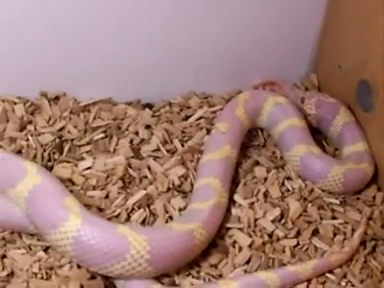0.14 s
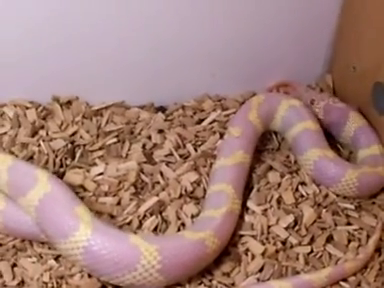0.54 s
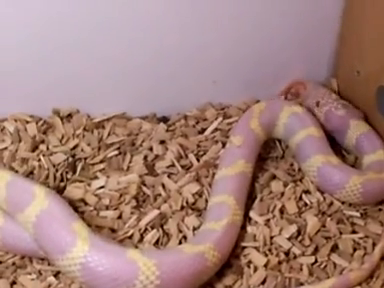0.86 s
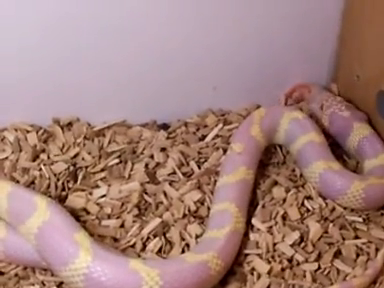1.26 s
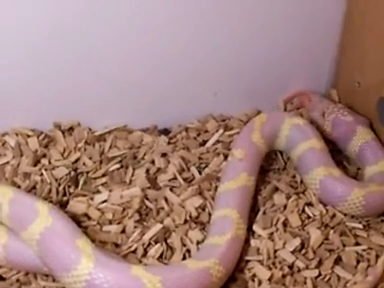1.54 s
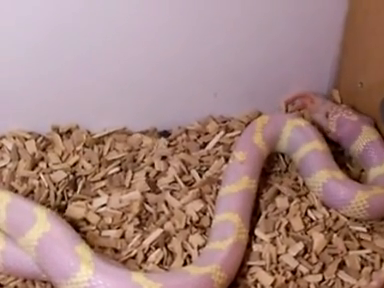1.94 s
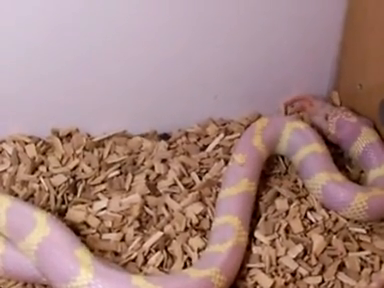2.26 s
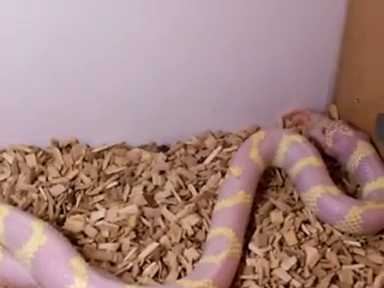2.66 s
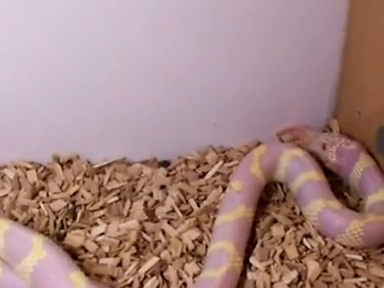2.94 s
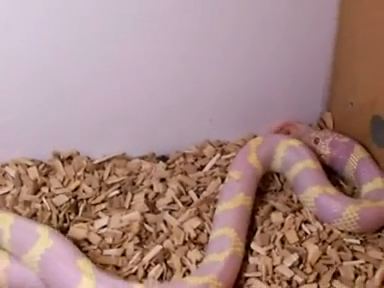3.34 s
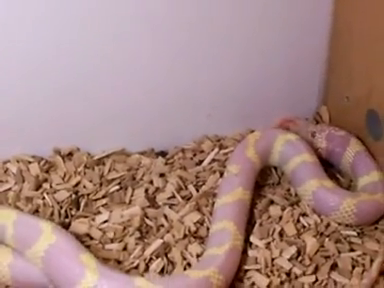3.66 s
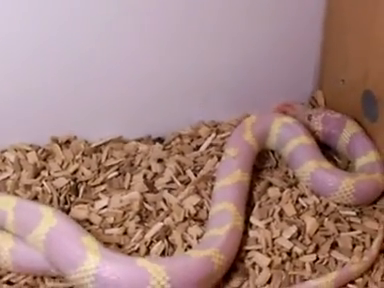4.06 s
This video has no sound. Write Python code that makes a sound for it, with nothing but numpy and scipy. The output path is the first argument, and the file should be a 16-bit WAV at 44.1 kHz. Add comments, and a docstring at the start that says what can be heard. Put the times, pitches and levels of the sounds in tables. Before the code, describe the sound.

A snake slides through dry wood chips in a box, with hissing scrapes, crisp crunches and dull low thumps, loudest near the end.

```python
"""In a wooden box of wood chips, a snake shifts about while a quiet room hums behind.
Its scales drag the chips in hissing strokes: rubbing grains coloured by resonances of the walls.
Chips crunch and tick as coils push: noise clumps and clean taps that ring the box; one chip squeaks in partials.
Pushes boom the box floor and low knocks sound floor and side panels, all as decaying sines, over a rumble
of filtered noise.
"""
import sys
import numpy as np
from scipy import signal
from scipy.fft import rfft, irfft, next_fast_len
from scipy.io import wavfile
from scipy.ndimage import uniform_filter1d, map_coordinates

SR = 44100
rng = np.random.default_rng(int(sys.argv[2]) if len(sys.argv) > 2 else 0)


def log_audio(samples):
    """Write samples as a 16-bit WAV file to the path given in sys.argv[1]."""
    # one column per channel
    frames = np.atleast_2d(samples).T
    # limit to full scale, then quantise
    limited = np.clip(frames, -1, 1)
    pcm = np.round(limited * 32767).astype(np.int16)
    wavfile.write(sys.argv[1], SR, pcm)


N = 184982  # samples

# Spectrum of the room tone; the last two points are left out: [f/Hz, relative density/dB]
ROOM_SPECTRUM = [(12, -48.5), (20, -20.5), (38, 6.5), (143, 5.5), (181, -1.5), (276, 0), (333, -1.5),
                 (1020, -11.5), (1230, -12.5), (5400, -21.5), (7020, -55), (11900, -120)]
ROOM_DB = -41
# Top of the band, for the room and for the whole sound
TOP_HZ = 7860

# Weight of the body on the floor: [t/s, rumble level/dB]
BODY_WEIGHT = [(0, -47), (.2, -40.5), (.33, -49), (.49, -42.5), (.61, -48.5), (.83, -47.5), (1.01, -37.5),
               (1.3, -41), (1.68, -47), (1.84, -46), (2.02, -42.5), (2.1, -37.5), (2.29, -36),
               (2.55, -45.5), (2.68, -39.5), (3.01, -37), (3.3, -37), (3.56, -53.5), (3.78, -44.5),
               (4.04, -40.5), (4.19, -48)]
# Resonances of the box, the first two belonging to its floor: [f/Hz, width/Hz, relative level/dB]
BOX_MODES = [(53.7, 24, -6.5), (140.3, 45, -4.5), (231.4, 12, 0.5), (252.7, 27, -7.5), (333.7, 7.1, -5),
             (503, 19, -11), (599.3, 20, -13.5), (765, 6.6, -26), (964, 29, -13), (1101, 21, -12),
             (1343, 33, -16.5), (1585, 24, -18), (1753, 17, -29.5)]
# Panels that the sliding body rubs: [f/Hz, width/Hz, relative level/dB]
PANEL_MODES = [(228.5, 82, -5), (343, 40, 1), (496, 27, -10), (585, 29, -6)]
# Panel rub against the weight, and against the scrape
RUB_WEIGHT_DB, RUB_STROKE_DB = -8.5, -12.5
# Each crunch shakes floor and panels
JOLT_FLOOR_DB, JOLT_RUB_DB, JOLT_T60_S = -13.5, -23.5, 0.13

# Low knocks of the box, near 200 Hz from its floor, higher from its side panels: [t/s, level/dB, f/Hz, hold/s]
BOX_KNOCKS = [(0.115, -29, 324, 0.014), (0.188, -28, 202, 0.013), (0.231, -32.5, 332.4, 0.018),
              (0.552, -37, 266, 0.011), (0.679, -35.5, 305, 0.02), (1.363, -34, 341.5, 0.017),
              (2.052, -36, 306, 0.016), (2.165, -23.5, 299, 0.012), (2.209, -29, 350, 0.02),
              (2.33, -28.5, 341, 0.013), (2.444, -31, 324.5, 0.012), (2.609, -20, 349.6, 0.018),
              (3.193, -21.5, 239.7, 0.032), (3.649, -38, 363, 0.015), (3.803, -20, 201, 0.0089),
              (3.813, -10, 253, 0.018), (3.835, -18.5, 335, 0.014), (3.905, -16, 259, 0.0073),
              (3.919, -24.5, 329, 0.011), (4.15, -24.5, 339, 0.01)]
KNOCK_SWELL_S, KNOCK_T60_S = 0.0064, 0.061  # time constant of the swell, decay by 60 dB

# Crunches of chips: [t/s, relative level/dB, tilt/dB per octave, hold/s, t60/s, relative box ring level/dB]
CHIP_CRUNCHES = [(0.119, -39, -2, .007, .077, 2), (0.166, -14, -9.5, 0.0052, 0.089, -5.5),
                 (0.186, -22.5, -8.5, 0.0044, 0.23, -6.5), (0.23, -18, -11, 0.0046, .08, -4.5),
                 (0.467, -31.5, -7, .007, 0.05, -4.5), (0.518, -34, 0, .016, .092, -15),
                 (0.622, -25, -1, 0.0068, .09, -10.5), (1.159, -22.5, -.5, .007, 0.087, -12),
                 (1.794, -26.5, -6, 0.0071, 0.11, -11.5), (2.159, -14.5, -1, 0.021, 0.076, -7.5),
                 (2.315, -28, -9.5, 0.0023, 0.12, 4.5), (2.583, -21.5, -5, .011, 0.031, -2),
                 (2.603, -13.5, 2, 0.0049, 0.028, 1), (2.61, -17.5, -4, 0.016, 0.045, -4),
                 (2.628, -24, -7, 0.0053, .089, 0), (2.995, -12.5, -2, .0063, 0.054, -6.5),
                 (3.037, -24, -3, 0.0056, .046, -3), (3.125, -18, 1.5, 0.0066, .02, -16),
                 (3.168, -22.5, 3, .013, .055, -10), (3.18, -12, -0.5, 0.017, 0.072, -6.5),
                 (3.193, -14, -15.5, .0033, 0.018, -2), (3.249, -30.5, 0, .014, 0.049, -10),
                 (3.801, -6.5, -2, 0.0099, 0.068, 2.5), (3.813, -17.5, -10, .0046, 0.021, -13),
                 (3.819, -8, -7, .01, 0.05, -4.5), (3.835, -24, -2, .005, 0.071, -6),
                 (3.904, -14.5, -2, .0043, 0.078, -2.5), (4.014, -38.5, -2, .007, 0.053, 2.5),
                 (4.147, -17.5, -6, 0.0068, .05, -0.5)]
RING_TILT_DB = 1.17  # per octave, added to the box modes that ring after a crunch
# Under a strong stroke a crunch swells: most added rise time, and the scrape level that brings it
SOFT_RISE_S, SOFT_AT_DB = 0.0035, -34

# Short squeak of a chip on the wall, one partial a row: [t/s, length/s, f/Hz, level/dB]
SQUEAK_PARTIALS = [(0.178, 0.027, 1040, -31.5), (0.185, 0.018, 1375, -29.5), (0.183, 0.035, 1630, -32.5),
                   (0.188, 0.02, 1840, -28.5), (0.2054, 0.019, 1860, -32.5), (0.174, 0.052, 3180, -40.5),
                   (0.183, 0.0225, 6500, -47)]

# Pushes on the box floor: [t/s, level/dB, f/Hz, hold/s, t60/s, direction (1 in, -1 out)]
FLOOR_PUSHES = [(0.184, -14, 111.3, 0.0067, 0.071, -1), (0.204, -21, 115.7, .019, 0.23, -1),
                (0.227, -27.5, 122, 0.0035, 0.053, 1), (0.401, -25, 107.6, 0.016, 0.11, 1),
                (0.686, -31.5, 129.6, 0.022, .2, 1), (0.869, -35, 119, 0.05, 0.15, 1),
                (0.994, -24, 117, 0.0042, 0.28, -1), (1.133, -29.5, 116.3, 0.08, .078, 1),
                (1.318, -22, 123.5, 0.0083, 0.2, -1), (1.36, -24, 120, .02, .19, 1),
                (1.863, -21, 116.6, .011, .18, 1), (2.019, -29.5, 127.4, 0.013, 0.15, 1),
                (2.06, -27.5, 90.4, .02, 0.14, -1), (2.17, -13.5, 126.6, .013, 0.068, 1),
                (2.293, -20, 144.4, 0.026, 0.35, 1), (2.37, -15, 130.9, .058, 0.14, 1),
                (2.582, -16.5, 105, 0.011, 0.047, 1), (2.623, -20.5, 103.3, .0053, 0.14, 1),
                (2.706, -28, 97.7, 0.012, 0.43, 1), (2.78, -26.5, 125, 0.0098, 0.11, 1),
                (2.888, -25, 129, .009, 0.27, 1), (2.954, -26, 136, .007, 0.24, 1),
                (3.006, -29, 127.7, 0.083, 0.14, 1), (3.176, -33.5, 117.2, 0.022, 0.5, 1),
                (3.237, -21.5, 134.2, 0.059, 0.11, 1), (3.378, -32, 130.2, .015, 0.57, 1),
                (3.802, -1, 116.7, 0.0028, 0.054, -1), (3.836, -17, 116, .004, 0.19, 1),
                (3.904, -14, 108.4, 0.0052, .04, -1), (3.922, -15.5, 121, 0.0023, 0.16, 1),
                (4.007, -24, 112, 0.018, 0.047, 1), (4.147, -12, 109, 0.0017, .08, 1)]
SWELL_S, SWELL_SHARE = 0.002, 0.14  # rise of a push: a least time plus a share of its hold

# Strokes of the body: [tilt/dB per octave, wall hum against scrape/dB, rows of (t/s, scrape level/dB)]
BODY_STROKES = [(1.74, -10, [(.44, -61.5), (.53, -44.5), (.75, -47), (.88, -40.5), (1.1, -39),
                (1.16, -33.5), (1.29, -33.5), (1.33, -36.5), (1.39, -60)]), (2.3, -9, [(2.02, -47.5),
                (2.06, -40), (2.15, -35.5), (2.225, -34.5), (2.24, -31), (2.28, -28), (2.31, -30.5),
                (2.4, -34), (2.43, -42), (2.49, -58)]), (4, -8.5, [(2.9, -60), (2.935, -41), (2.98, -34),
                (3.07, -35.5), (3.16, -36.5), (3.22, -35), (3.28, -58)]), (3.7, -10, [(3.75, -59),
                (3.795, -41.5), (3.87, -47), (3.96, -66.5)]), (3.5, -27, [(4.05, -62), (4.14, -43),
                (4.19, -46)])]
STILL_DB = -90  # scrape level between strokes
# Spectrum of chips rubbing: [f/Hz, relative density/dB]
CHIP_SPECTRUM = [(200, -23.5), (700, -15), (1500, 3.5), (3500, -2), (5200, -4)]
# Walls and air of the box over the scraping: [f/Hz, width/Hz, relative level/dB]
WALL_MODES = [(1580, 35, -12), (2192, 19, 1), (2194, 4.9, 3.5), (2370, 25, -18), (2845, 13, 2),
              (3330, 30, -9), (3357, 62, -8.5), (3600, 49, 1.5), (3876, 61, -8.5), (4400, 50, -21.5),
              (4390, 39, -13), (4830, 120, 0), (4880, 15, -10)]
# Low wall modes that hum under the strokes: [f/Hz, width/Hz, relative level/dB]
WALL_HUM_MODES = [(956, 43, 1.5), (1055, 20, -5.5)]

# A coil rubbing the corner: [t/s, length before release/s, starting level/dB]
COIL_CORNER_RUBS = [(1.149, .17, -37.5), (2.227, 0.186, -26.5), (2.972, 0.064, -38)]
# Two broad resonances of the hollow corner: [f/Hz, width/Hz, relative level/dB]
CORNER_MODES = [(2130, 260, 0.5), (4060, 340, -2)]
CORNER_ATTACK_S, CORNER_SAG_DB_PER_S, CORNER_RELEASE_S = 0.008, 52.5, 0.03

# Tone of the whole sound: [f/Hz, gain/dB]
OUTPUT_TONE = [(20, -2), (60, -3.5), (5000, 2), (5600, -2.5), (6000, -12), (6500, -9), (7200, -18),
               (7500, -32.5), (7800, -44.5)]
CLIP_TOP = 0.37  # ceiling of the soft clipping, ahead of the output tone


def amp(db):
    """Gain of a level in dB."""
    return 10 ** (np.asarray(db) / 20)


def unit(x):
    """x at rms 1."""
    return x / np.sqrt(np.mean(x ** 2) + 1e-20)


def along(points, hz):
    """Values at hz from (Hz, value) points on a log axis."""
    f, v = np.transpose(points)
    return np.interp(np.log(hz + 1), np.log(f + 1), v)


def curves(rows):
    """One value per sample for each column after the time."""
    s, *columns = np.transpose(rows)
    return [np.interp(np.arange(N) / SR, s, column) for column in columns]


def filtered(x, response):
    """x through a complex response of frequency."""
    size = next_fast_len(x.shape[-1] + 8192)
    spectrum = rfft(x, size) * response(np.fft.rfftfreq(size, 1 / SR))
    return irfft(spectrum, size)[..., :x.shape[-1]]


def modes(table, f):
    """Causal response of a set of resonances, alternating in sign."""
    total = 0
    for k, (centre, width, db) in enumerate(table):
        damping = 1j * f * width
        total = total + (-1) ** k * amp(db) * damping / (centre * centre - f * f + damping)
    return total


def wobble(rate):
    """A smooth random curve, rate knots a second."""
    knots = rng.standard_normal(int(N * rate / SR) + 4)
    return map_coordinates(knots, [np.arange(N) * rate / SR])


def tilted(x, tilt_db, pivot_hz=2500):
    """x with a slope per octave that may change over time."""
    hz, t, z = signal.stft(x, SR, nperseg=256)
    slope = tilt_db[np.minimum((t * SR).astype(int), len(x) - 1)]
    octaves = np.log2((hz[:, None] + 300) / pivot_hz)
    return signal.istft(z * amp(octaves * slope), SR, nperseg=256)[1][:len(x)]


def patches(x, patchy_db):
    """x with narrow, lasting patches of random gain: the chips lie differently from moment to moment."""
    z = signal.stft(x, nperseg=1024)[2]
    field = uniform_filter1d(rng.standard_normal(z.shape), size=2, axis=0)  # over frequency
    field = uniform_filter1d(field, size=8, axis=1)  # over time
    return signal.istft(z * amp(patchy_db * unit(field)), nperseg=1024)[1][:len(x)]


def strokes():
    """Scrape level, tilt and hum level of the stroke under way."""
    t = np.arange(N) / SR
    out = np.zeros((3, N)) + [[STILL_DB], [0], [0]]
    for tilt_db, hum_db, rows in BODY_STROKES:
        on = (t >= rows[0][0]) & (t <= rows[-1][0] + .01)
        out[0, on] = curves(rows)[0][on]
        out[1, on] = tilt_db
        out[2, on] = hum_db
    return out


def jolts():
    """Envelope of the shaking that each crunch sets off: held, then dying."""
    t = np.arange(N) / SR
    total = np.zeros(N)
    for s, db, _, held, _, ring_db in CHIP_CRUNCHES:
        fall_db = 60 * np.maximum(t - s - held, 0) / JOLT_T60_S
        total += (t > s) * amp(db + ring_db - fall_db)
    return total


def room():
    """Hum and hiss: noise shaped by the room spectrum, its level wavering slightly."""
    colour = lambda f: amp(along(ROOM_SPECTRUM[:-2], f)) * (f < TOP_HZ)
    tone = unit(filtered(rng.standard_normal(N), colour))
    return amp(ROOM_DB + 0.64 * wobble(6.46)) * tone


def shaken(part):
    """Resonances driven by unsteady noise, rolling off above 600 Hz."""
    force = rng.standard_normal(N) * amp(3.1 * wobble(25.03))
    return unit(filtered(force, lambda f: modes(part, f) / (1 + 1j * f / 600)))


def rumble():
    """Weight, strokes and jolts keep the floor and the panels lightly ringing."""
    weight, jolt = amp(curves(BODY_WEIGHT)[0]), jolts()
    floor = (weight + amp(JOLT_FLOOR_DB) * jolt) * shaken(BOX_MODES[:2])
    rub = amp(RUB_WEIGHT_DB) * weight + amp(RUB_STROKE_DB + strokes()[0]) + amp(JOLT_RUB_DB) * jolt
    panels = rub * amp(2.5 * wobble(12)) * shaken(PANEL_MODES)
    return floor + panels


def knocks():
    """Floor or side panel swells, is held and rings out as a low sine, a little unsteadily."""
    out, t = np.zeros(N + SR), np.arange(SR // 4) / SR
    for s, db, hz, held in BOX_KNOCKS:
        swell = 1 - np.exp(-t / KNOCK_SWELL_S)
        shape = swell * amp(db - 60 * np.maximum(t - held, 0) / KNOCK_T60_S)
        out[round(s * SR):][:len(t)] += shape * np.sin(2 * np.pi * (hz * t + rng.random()))
    return out[:N] * amp(0.75 * wobble(60))


def crunches():
    """Each crunch is a clump of chip contacts: a snap, a held rattle, a dying tail; the box rings after it."""
    chips, t, scrape_db = np.zeros(N + SR), np.arange(SR // 4) / SR, strokes()[0]
    ringing = [(c, w, db + RING_TILT_DB * np.log2(c / 500)) for c, w, db in BOX_MODES[2:]]
    wood = lambda f: modes(ringing, f)
    for s, db, tilt_db, held, t60, ring_db in CHIP_CRUNCHES:
        softness = min(amp(2 * (scrape_db[round(s * SR)] - SOFT_AT_DB)), 1)
        onset = 1 - np.exp(-t / (.0003 + SOFT_RISE_S * softness))
        rattle = amp(-60 * np.maximum(t - held, 0) / t60)
        snap = 0.95 * np.exp(-t / 0.0011)
        shape = onset * (rattle + snap)
        # bursts of 30 samples at random levels
        clumps = amp(1.6 * np.repeat(rng.standard_normal(len(t) // 30 + 1), 30)[:len(t)])
        contacts = rng.standard_normal(len(t)) * clumps
        # the clump as a whole keeps its strength
        contacts *= np.sqrt(np.sum(shape ** 2) / np.sum((shape * contacts) ** 2))
        # tilt, with the bass rolled off below 450 Hz
        colour = lambda f: amp(tilt_db * np.log2((f + 300) / 2000)) * f ** 2 / (f ** 2 + 450 ** 2)
        tap = 3.64 * np.exp(-t / 0.00011)  # the first contact is one clean tap
        blow = 0.61 * shape * contacts + tap
        clump = amp(-7.0) * shape * filtered(contacts, colour)
        ring = amp(ring_db + 20.5) * filtered(blow, wood)
        chips[round(s * SR):][:len(t)] += amp(db) * (clump + ring)
    return chips[:N]


def squeak():
    """A chip squeaks on the wall: partials unsteady in level and phase, each under a short arch."""
    t, out = np.arange(N) / SR, np.zeros(N)
    for s, length, hz, db in SQUEAK_PARTIALS:
        arch = np.sin(np.pi * np.clip((t - s) / length, 0, 1)) ** 0.77
        level = amp(db + 1.3 * wobble(84.0))
        out += arch * level * np.sin(2 * np.pi * hz * t + 0.74 * wobble(116))
    return out


def pushes():
    """The box floor swells, is held and rings out near 120 Hz, while its lowest mode dies away beneath."""
    out, t = np.zeros(N + SR), np.arange(SR // 2) / SR
    for s, db, hz, held, t60, direction in FLOOR_PUSHES:
        swell = SWELL_S + SWELL_SHARE * held
        rise = np.sin(np.pi / 2 * np.clip(t / swell, 0, 1))
        floor = amp(-60 * np.maximum(t - SWELL_S - held, 0) / t60) * np.sin(2 * np.pi * hz * t)
        lowest = amp(-14.5 - 60 * t / 0.31) * np.sin(2 * np.pi * BOX_MODES[0][0] * t)
        out[round(s * SR):][:len(t)] += np.sign(direction) * amp(db) * rise * (floor + lowest)
    return out[:N]


def drag():
    """Dense grains of rubbing, with sparse ticks among them, ring the walls; the low wall modes hum in throbs."""
    scrape_db, tilt_db, hum_db = strokes()
    ticks = (rng.random(N) < 150 / SR) * rng.standard_normal(N) * amp(20.5)  # about 150 a second
    rubbing = rng.standard_normal(N) * amp(1.4 * wobble(400) + 0.89 * wobble(40.2))
    grains = rubbing + ticks
    colour = lambda f: amp(along(CHIP_SPECTRUM, f)) * (0.4 + modes(WALL_MODES, f))
    hiss = unit(patches(filtered(grains, colour), patchy_db=3.0))
    hum = unit(filtered(grains, lambda f: modes(WALL_HUM_MODES, f)))
    return amp(scrape_db) * (tilted(hiss, tilt_db) + amp(hum_db) * hum)


def corner():
    """Grainy rubbing through the hollow of the corner and the wall modes: quick to start, sagging, let go."""
    t, level = np.arange(N) / SR, np.zeros(N)
    ramp = lambda u: np.clip(u, 0, 1) ** 2
    for s, length, db in COIL_CORNER_RUBS:
        sag = amp(db - CORNER_SAG_DB_PER_S * np.maximum(t - s, 0))
        attack = ramp((t - s) / CORNER_ATTACK_S)
        release = ramp(1 - (t - s - length) / CORNER_RELEASE_S)
        level += sag * attack * release
    grains = rng.standard_normal(N) * amp(0.53 * wobble(300))
    colour = lambda f: modes(CORNER_MODES, f) * (0.34 + modes(WALL_MODES, f))
    return level * unit(filtered(grains, colour))


def scene():
    """All sources, one channel."""
    background = room() + rumble()
    blows = knocks() + crunches() + squeak() + pushes()
    scraping = drag() + corner()
    return (background + blows + scraping)[None]


def record(dry):
    """Soft clipping of the loudest blows, treble falling with a notch near 6 kHz, then the band limit."""
    clipped = dry / (1 + np.abs(dry / CLIP_TOP) ** 5) ** (1 / 5)
    toned = filtered(clipped, lambda f: amp(along(OUTPUT_TONE, f)))
    return filtered(toned, lambda f: f < TOP_HZ)


dry = scene()
out = record(dry)
log_audio(out)
```